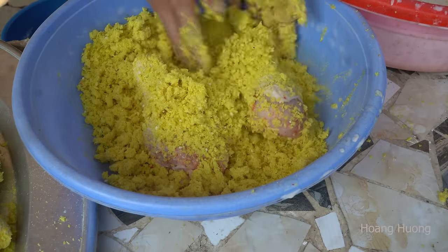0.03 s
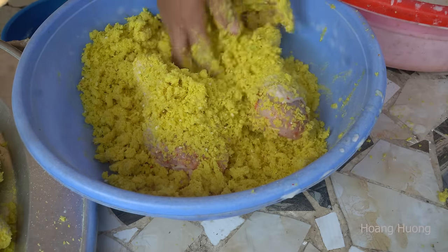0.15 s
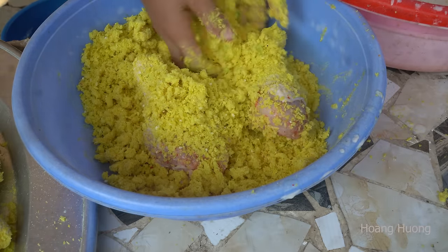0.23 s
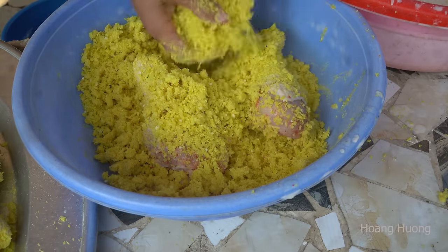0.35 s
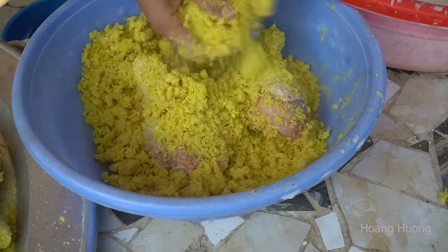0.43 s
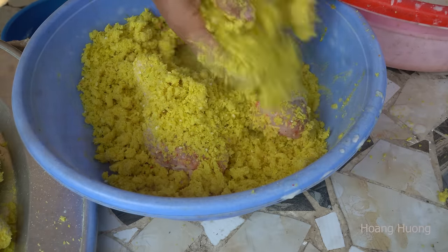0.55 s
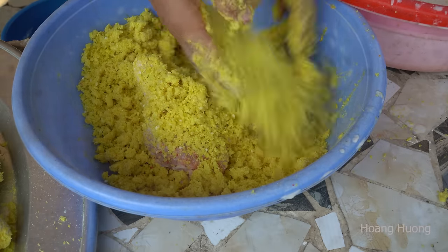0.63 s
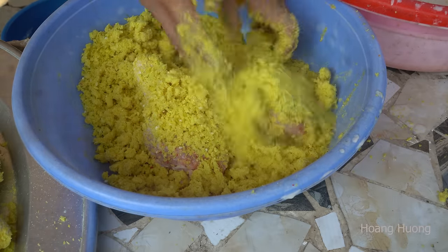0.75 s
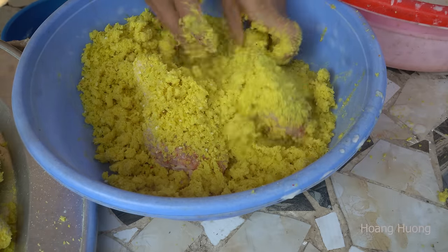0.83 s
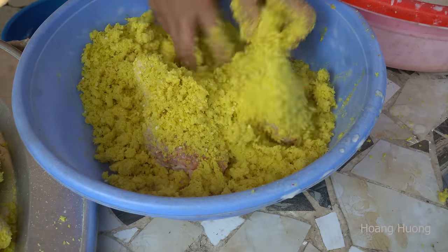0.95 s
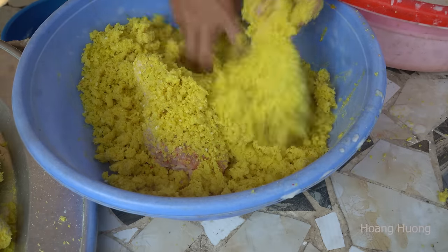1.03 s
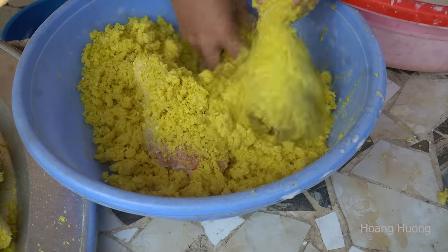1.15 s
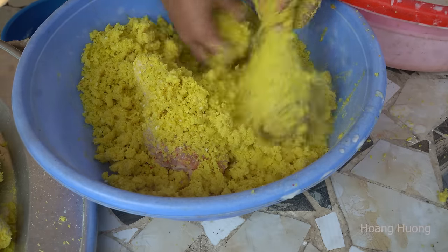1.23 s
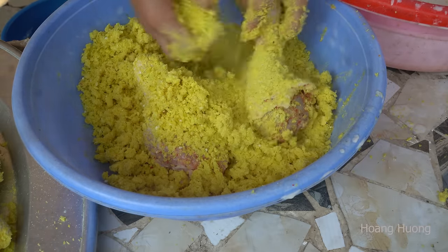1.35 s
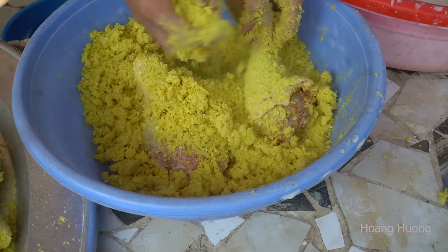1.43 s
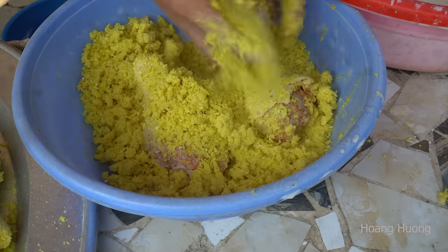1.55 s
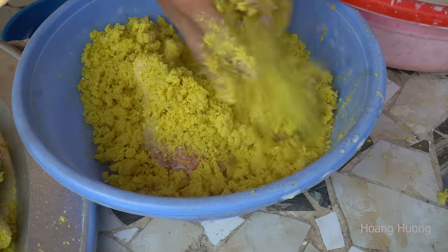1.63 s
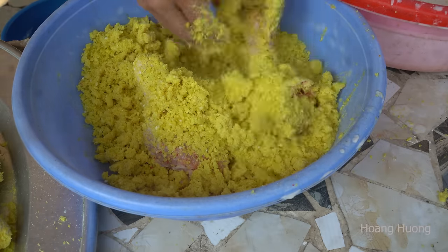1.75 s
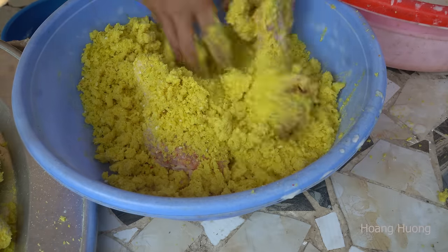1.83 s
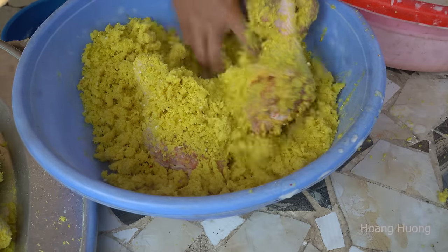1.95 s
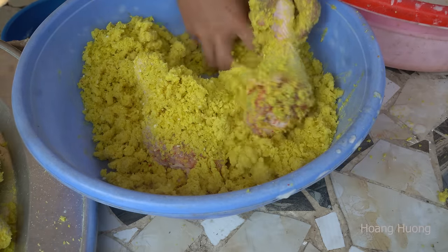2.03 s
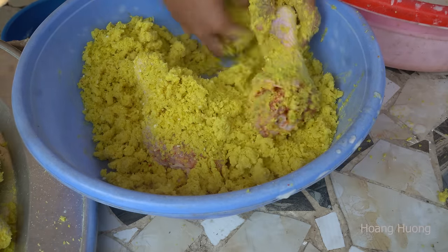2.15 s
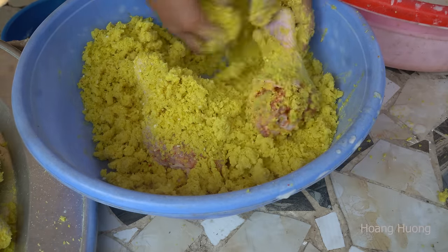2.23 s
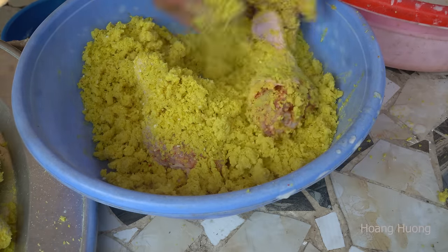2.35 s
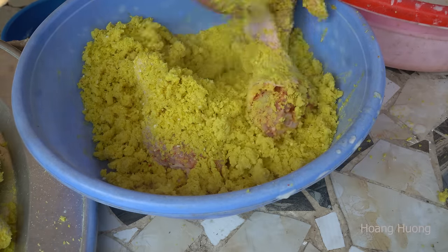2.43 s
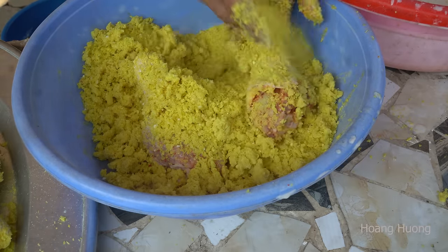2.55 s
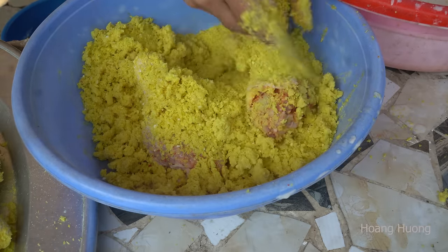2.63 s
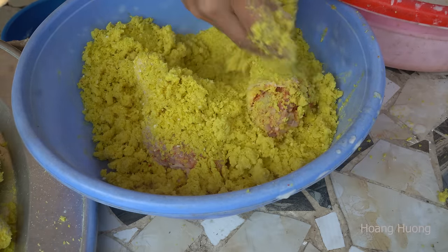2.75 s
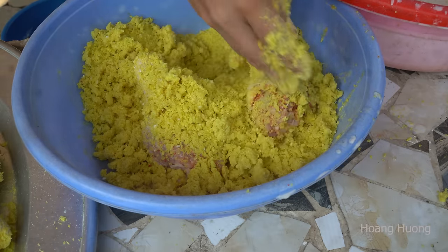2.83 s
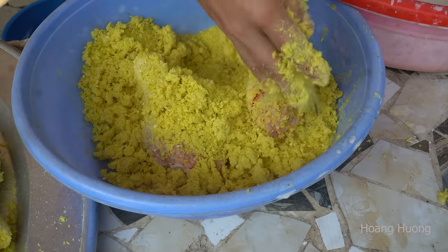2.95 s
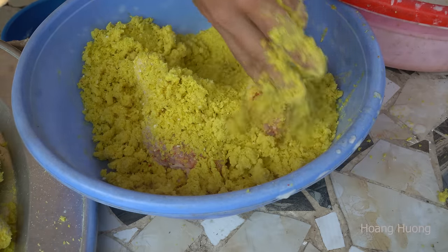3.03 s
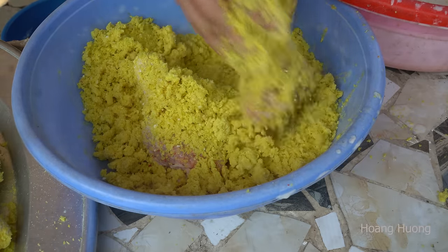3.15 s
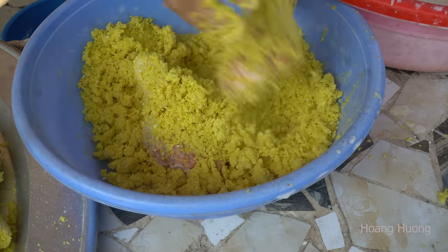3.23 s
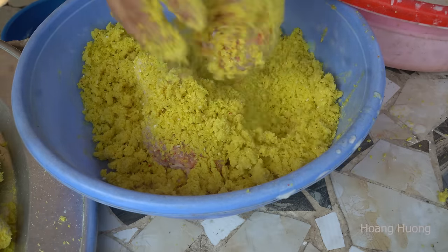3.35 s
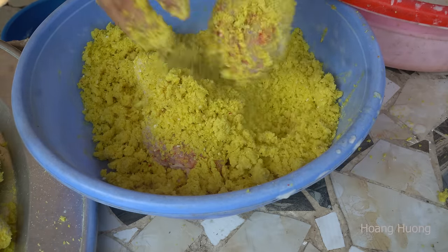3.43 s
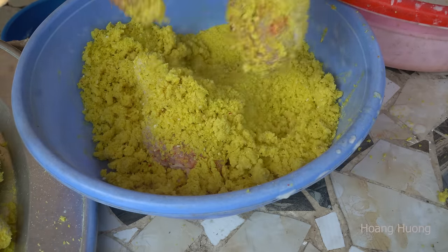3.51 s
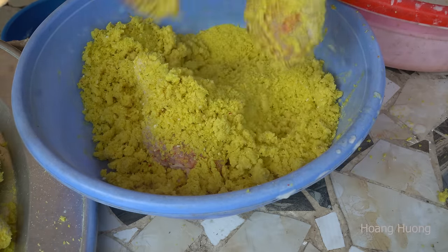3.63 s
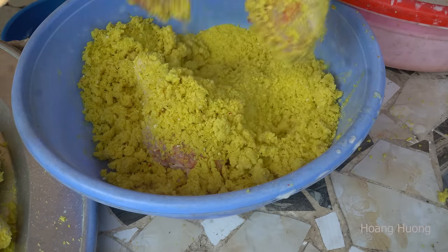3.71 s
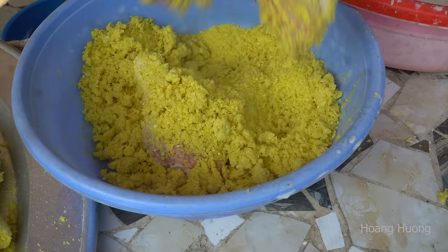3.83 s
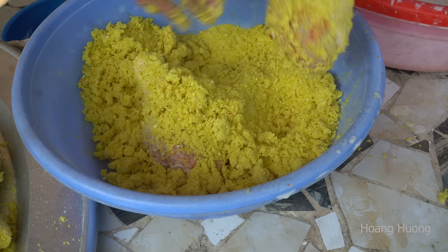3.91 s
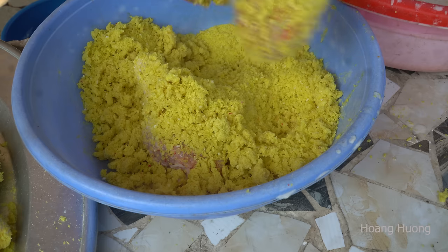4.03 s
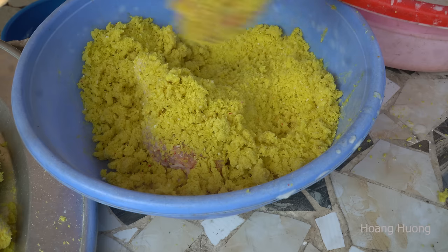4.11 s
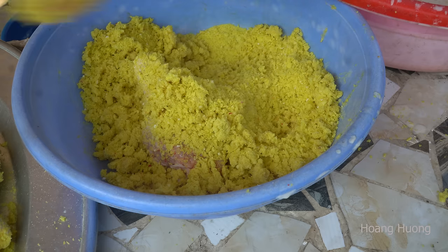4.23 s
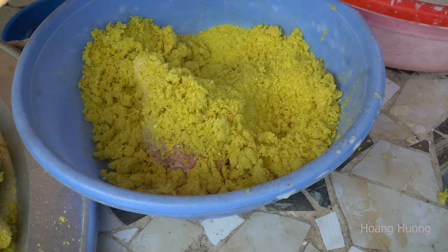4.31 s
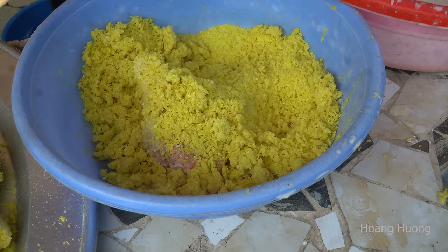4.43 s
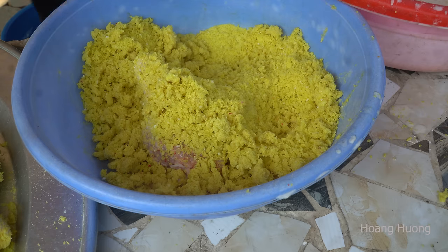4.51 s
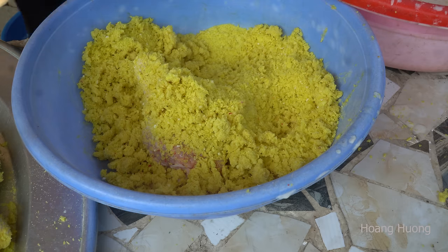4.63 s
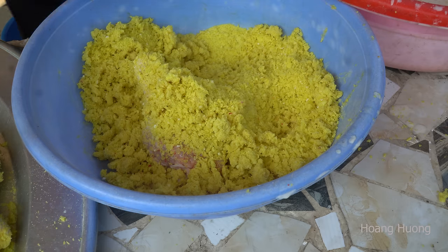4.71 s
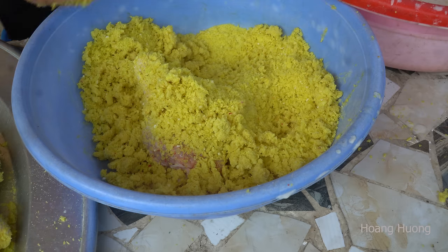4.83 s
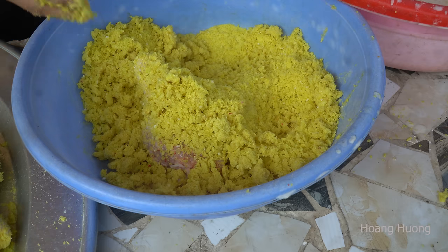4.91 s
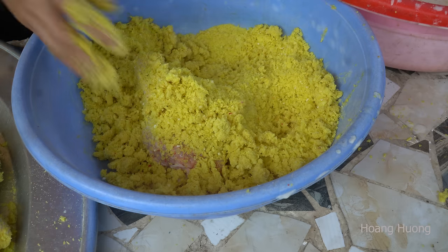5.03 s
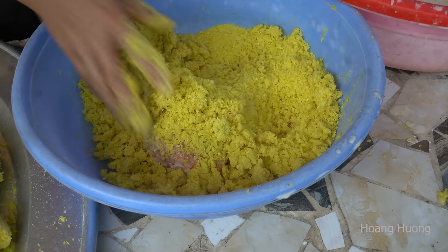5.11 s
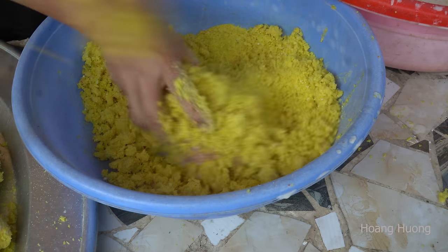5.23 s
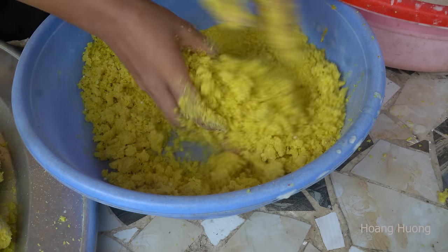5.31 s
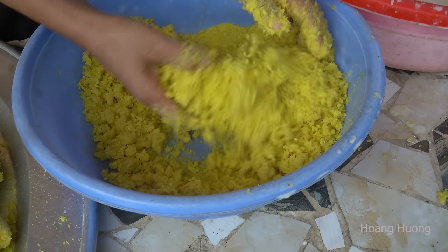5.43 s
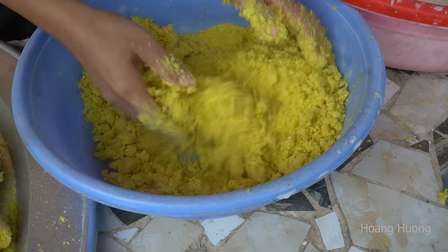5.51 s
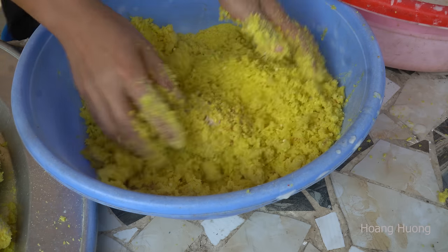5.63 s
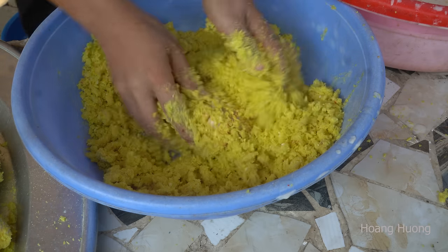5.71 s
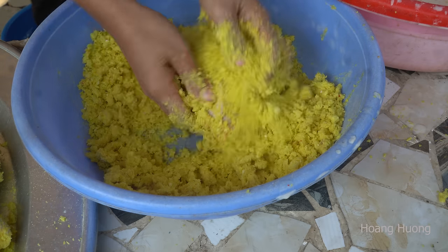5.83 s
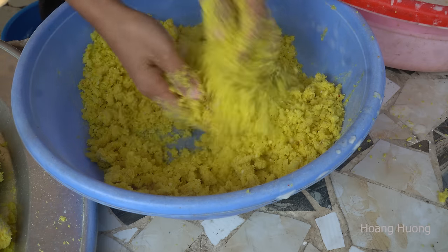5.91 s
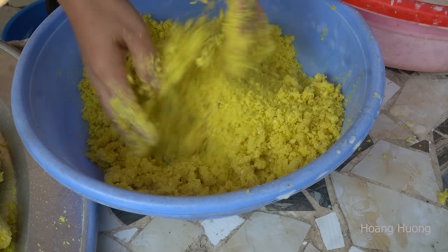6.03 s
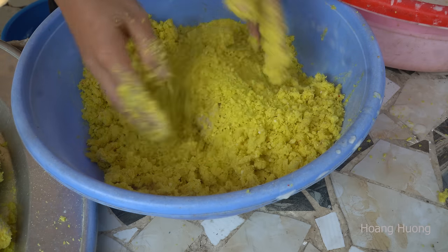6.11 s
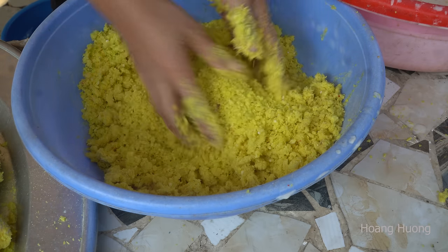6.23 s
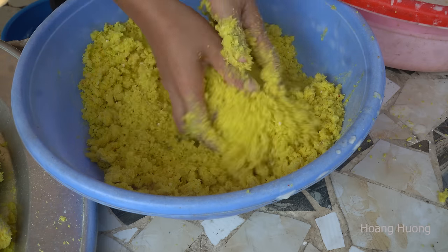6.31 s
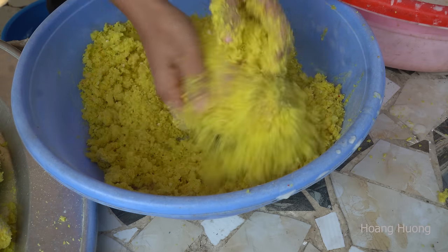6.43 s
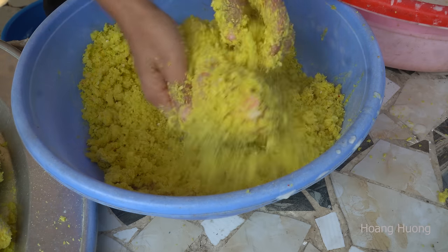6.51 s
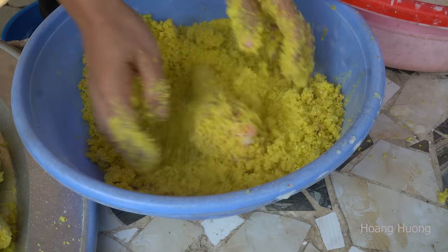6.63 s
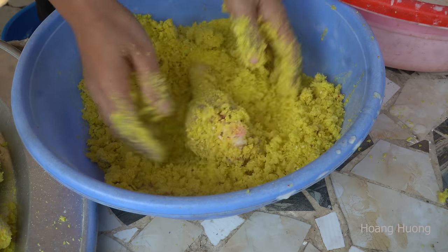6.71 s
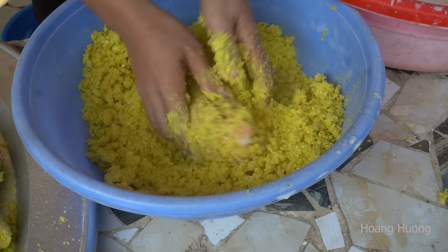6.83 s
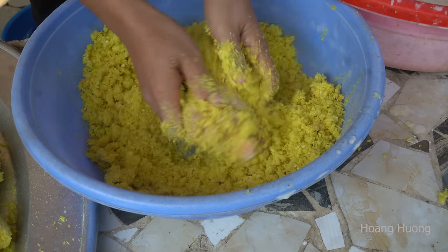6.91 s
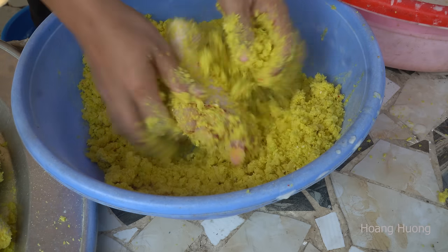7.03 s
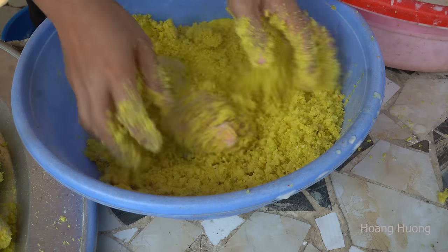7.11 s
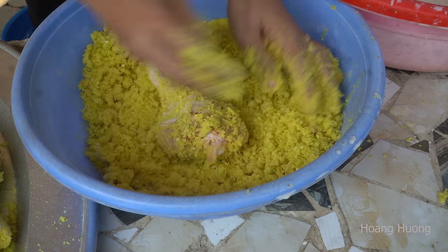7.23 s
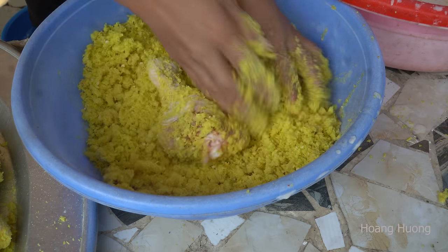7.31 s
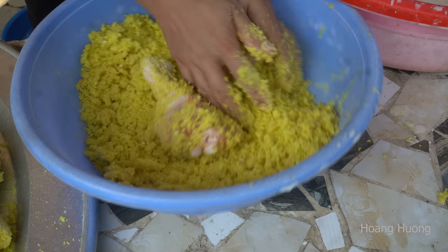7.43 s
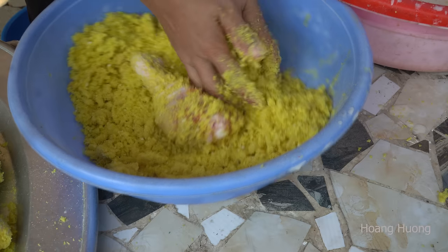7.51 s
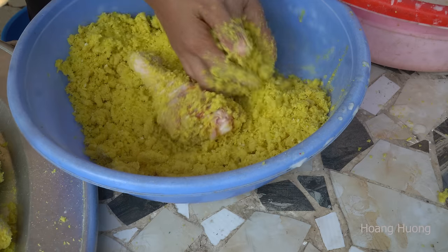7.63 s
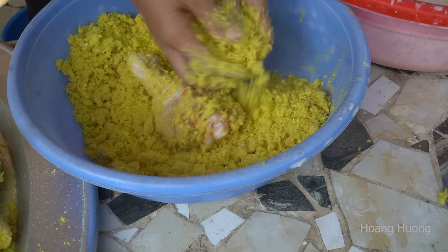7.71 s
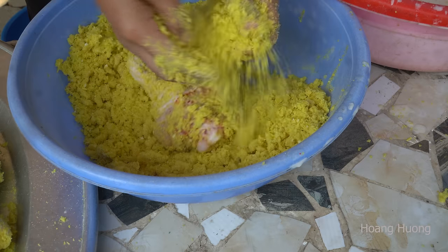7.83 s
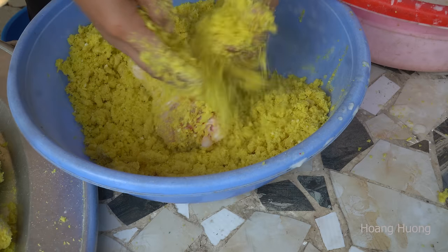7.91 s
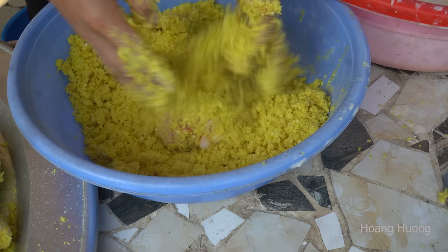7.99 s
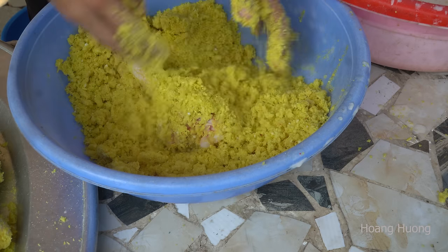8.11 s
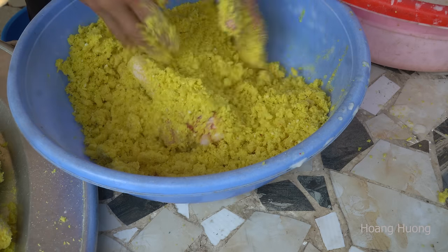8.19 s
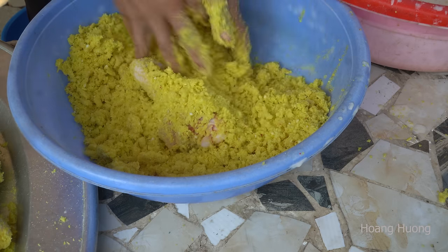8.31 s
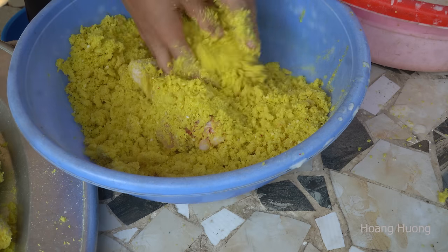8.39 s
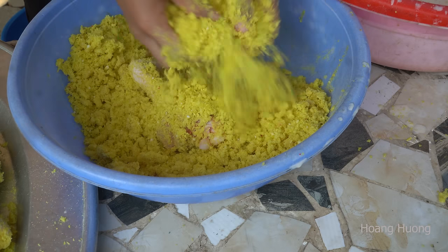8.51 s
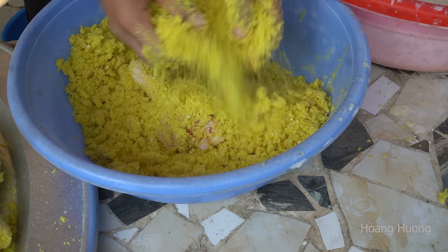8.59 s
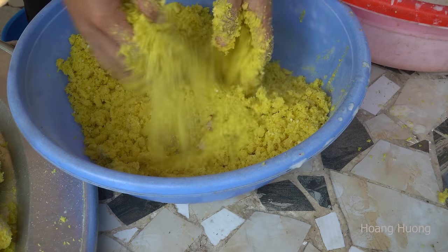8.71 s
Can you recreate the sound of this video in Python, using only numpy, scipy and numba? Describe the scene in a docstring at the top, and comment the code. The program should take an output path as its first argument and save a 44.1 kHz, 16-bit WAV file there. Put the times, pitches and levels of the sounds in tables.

```python
"""Crumbing chicken by hand

Two hands scoop dry breadcrumbs over raw chicken in a plastic basin on a tiled floor, close to the microphone.
Each stroke is a swarm of random clicks and noise: digging deep adds the basin's body, poured crumbs mostly fizz.
Short filtered bursts make the cracks, ticks and sticky smacks, noise-fed resonances rasp and paired sines thud.
Low noise in gusts rumbles on the microphone over a faint far drone and steady hiss."""
import sys
import numpy as np
from scipy import signal
from scipy.fft import rfft, irfft
from scipy.io import wavfile
from scipy.ndimage import map_coordinates
from numba import njit

SR = 44100
rng = np.random.default_rng(int(sys.argv[2]) if len(sys.argv) > 2 else 0)


def wav_out(sig):
    """Save sig, one row per channel (or a flat mono array), as 16-bit PCM at SR to the path in sys.argv[1]."""
    wavfile.write(sys.argv[1], SR, np.round(np.clip(np.atleast_2d(sig).T, -1, 1) * 32767).astype(np.int16))


N = 386316
TIME = np.arange(N) / SR
STEPS = np.arange(0, N, 64) / SR  # coarser clock for the level curves, in seconds
FILTER_SIZE = 8192
FREQ = np.maximum(np.arange(FILTER_SIZE // 2 + 1) * SR / FILTER_SIZE, 1)
SIDES = np.array([[1], [-1]])  # left, right
# resonances of the loaded basin: centre_hz, width_hz, lift_db
BASIN = [(858, 150, 6.5), (1161, 92, 5), (1672, 44, 4), (1880, 100, 2.5), (2590, 38, 5.5), (3915, 160, 2)]


def undb(db):
    """Decibels to gain."""
    return 10 ** (np.asarray(db) / 20)


def unit(x):
    """Scale to rms 1."""
    return x / np.sqrt(np.mean(x ** 2))


def curves(table):
    """Each column of a table, after its time column, as a value per sample."""
    s, *columns = np.transpose(table)
    return [np.interp(TIME, s, column) for column in columns]


def spectrum(points):
    """Gain at every frequency from (Hz, dB) points, joined along log frequency."""
    hz, db = np.transpose(points)
    return undb(np.interp(np.log(FREQ), np.log(hz), db))


def bell(hz, width_hz):
    """Gain of one resonance, 1 at its centre."""
    return 1 / np.sqrt(1 + ((FREQ ** 2 - hz ** 2) / (FREQ * width_hz)) ** 2)


def lifted(resonances):
    """Gain of (Hz, width Hz, dB lift) resonances on a flat spectrum; overlapping lifts add in dB."""
    return undb(sum(db * bell(hz, width) ** 2 for hz, width, db in resonances))


def impulse_response(gain):
    """Causal (minimum-phase) response with the given gain: it rings after a click, never before."""
    cepstrum = irfft(np.log(gain + 1e-6))[:FILTER_SIZE // 2]
    cepstrum[0] /= 2
    return irfft(np.exp(rfft(2 * cepstrum, FILTER_SIZE)))[None, :FILTER_SIZE // 2]


def colour(x, gain):
    """Filter each row of a sound with the given gain."""
    x = np.atleast_2d(x)
    return signal.oaconvolve(x, impulse_response(gain), axes=1)[:, :x.shape[1]]


@njit
def moving_ring(x, hz, width_hz):
    """State-variable band-pass whose centre may move; gain 1 at the centre."""
    y, band, low = np.empty(len(x)), 0., 0.
    for i in range(len(x)):
        g, k = np.tan(np.pi * hz[i] / SR), width_hz / hz[i]
        v = (band + g * (x[i] - low)) / (1 + g * (g + k))
        band, low, y[i] = 2 * v - band, low + 2 * g * v, k * v
    return y


def walk(rate):
    """Random wander with a spread near 1, in straight lines between `rate` random knots per second."""
    knots = rng.standard_normal(4096)
    return map_coordinates(knots, [TIME * rate], order=1, mode="wrap") * np.sqrt(3 / 2)


def swell(start, rise, hold, fall):
    """Attack, hold and release in dB: 0 at the top, straight slopes in dB on either side."""
    range_db = 20.5  # spanned by each rise or fall; the slopes then run on to ten times this
    early = (start + rise - STEPS) / max(rise, 1e-3)
    late = (STEPS - start - rise - hold) / max(fall, 1e-3)
    return -range_db * np.clip(np.maximum(early, late), 0, 10)


def together(levels_db, floor_db):
    """Level per sample of overlapping sounds above a floor: their powers add."""
    power = np.sum(undb(levels_db) ** 2, axis=0) + undb(floor_db) ** 2
    return np.interp(TIME, STEPS, 10 * np.log10(power))


def add(out, s, sound, db, pan_db):
    """Place a short sound at its start time, peak level of the middle and side."""
    start = int(s * SR)
    sound = np.atleast_2d(sound)
    sound = (sound / np.abs(sound.mean(axis=0)).max())[:, :N - start]
    out[:, start:start + sound.shape[1]] += sound * undb(db + SIDES * pan_db / 2)


def fracture(snap_s, settle_s, settle_db):
    """One sharp break and the short rattle of its fragments, as fading random signs: (mid, side)."""
    t = TIME[:2048]
    decay = np.exp(-t / snap_s) + undb(settle_db) * np.exp(-t / settle_s)
    return np.sign(rng.standard_normal((2, len(t)))) * decay


def grains(rate, scatter_db):
    """Random clicks of steady mean power, each from its own direction: (mid, side)."""
    chance, sign, place = rng.random(N), rng.standard_normal(N), rng.standard_normal(N)
    size = undb(scatter_db * np.minimum(rng.exponential(size=N), 4))
    # denser clicks are made smaller so that the power holds
    clicks = unit((chance < rate / SR) * np.sign(sign) * size / np.sqrt(rate))
    return np.array([clicks, clicks * np.sign(place) * np.sqrt(np.abs(place))])


def off_the_wall(x):
    """The basin's wall returns a weaker copy about 2 ms later."""
    lag, strength = int(SR * rng.uniform(.0015, .0023)), .55
    return x + strength * np.pad(x, ((0, 0), (lag, 0)))[:, :x.shape[1]]


def air(gain, width):
    """Stereo noise of a given colour; mid and side share one rms of 1 before the side is widened."""
    mid, side = unit(colour(rng.standard_normal((2, N)), gain))
    return mid + width * SIDES * side


def rumble(trim_db=0.1, flutter_db=3.4):
    """Puffs of air on the microphone: very low noise that swells and flutters."""
    # puffs: start_s, rise_s, hold_s, fall_s, level_db (before trim and flutter)
    puffs = [(0.0, 0.64, 0.26, 0.28, -54.5), (0.976, 0.074, 0.21, 0.38, -52.5),
             (1.415, 0.19, 0.11, 0.28, -54), (1.8, 0.14, 0.043, 1.2, -65.5),
             (2.85, 0.11, 0.27, 0.19, -65.5), (4.242, 0.27, 0.81, 0.25, -53),
             (5.446, 0.091, 0.15, 2.1, -53.5), (6.297, 0.12, 0.4, 0.31, -53), (7.5, 0.13, 0.25, .15, -71),
             (8.035, 0.068, 0.035, 0.58, -63)]
    # colour of the moving air: freq_hz, gain_db (relative)
    draught_colour = [(11, -35), (18, 6.5), (32, 5), (51, -2), (84, -7.5), (167, -25), (243, -40.5),
                      (300, -43), (390, -43), (660, -120)]
    calm_db = -79  # between the puffs, before trim and flutter
    wind_db = together([db + swell(*shape) for *shape, db in puffs], calm_db)
    tone = spectrum(draught_colour) / (1 + (22 / FREQ) ** 4)  # thins out below 22 Hz
    return air(tone, width=0.15) * undb(wind_db + trim_db + flutter_db * walk(rate=11))


def drone(drone_hz=415, width_hz=120, waver_db=3.6):
    """A far, wavering drone: a narrow band of noise that swells now and then."""
    # swells: top_s, level_db (before the waver)
    drone_swells = [(.4, -67), (2.78, -64), (3.76, -71.5), (4.93, -66.5), (5.999, -60.5), (8.0, -66.5)]
    rest_db, rise_s, fall_s = -77.5, 0.31, 0.16
    levels_db = [db + swell(s - rise_s, rise_s, 0, fall_s) for s, db in drone_swells]
    far_db = together(levels_db, rest_db)
    return air(bell(drone_hz, width_hz) ** 2, width=0.12) * undb(far_db + waver_db * walk(rate=11))


def hiss(level_db=-75.5):
    """Steady faint background noise, as wide as it is central."""
    # colour: freq_hz, gain_db (relative)
    ambience = [(35, -21), (60, -18), (210, -6.5), (298, -6), (385, -4), (773, -12), (1320, -12),
                (1900, -13), (3200, -14.5), (4800, -19), (6500, -21.5), (15500, -32)]
    # narrow peaks: centre_hz, width_hz, lift_db
    hiss_peaks = [(4100, 380, 9.5), (5540, 280, 13.5)]
    return air(spectrum(ambience) * lifted(hiss_peaks), width=1.0) * undb(level_db)


def background():
    """Gusty rumble on the microphone, a far drone and steady faint hiss."""
    return rumble() + drone() + hiss()


def room(x, t60_s, wet_db, damp_hz):
    """Tiles and walls return a short, duller tail: decaying noise through a gentle low-pass."""
    t = TIME[:SR // 2]
    tail = rng.standard_normal((2, len(t))) * undb(-60 * t / t60_s) * (t > .003)  # 3 ms gap first
    tail = signal.sosfilt(signal.butter(1, min(damp_hz, SR / 3), fs=SR, output="sos"), tail)
    tail = tail / np.sqrt(np.sum(tail ** 2) / 2)
    return x + undb(wet_db) * signal.oaconvolve(x, tail, axes=1)[:, :N]


def bumps(rise_s=0.0041, decay_s=0.017, overtone=1.654, overtone_db=-8):
    """The crumb-laden basin thuds in two sine modes and dies away within a few cycles."""
    # dull bumps: start_s, peak_db, pitch_hz
    thuds = [(0.853, -73, 120), (1.254, -71, 119), (1.974, -48, 130), (4.97, -41, 131), (6.69, -50.5, 172),
             (6.968, -63, 129), (7.519, -47, 208), (7.565, -49, 167), (7.591, -52.5, 122), (8.41, -62, 130)]
    out, t = np.zeros((2, N)), TIME[:8192]
    for s, db, hz in thuds:
        modes = np.sin(2 * np.pi * hz * t) + undb(overtone_db) * np.sin(2 * np.pi * hz * overtone * t)
        add(out, s, modes * (1 - np.exp(-t / rise_s)) * np.exp(-t / decay_s), db, 0)
    return out


def rings(rise_s=0.00059, width_hz=260):
    """Rubbing crumbs feed a narrow resonance for a moment: a rough tone that swells and fades."""
    # rasps on the plastic: start_s, peak_db, pitch_hz, decay_s
    rasps = [(0.703, -45, 2110, 0.035), (1.713, -42, 2070, 0.014), (2.63, -66, 2120, 0.065),
             (3.775, -59.5, 2210, 0.036), (3.869, -62.5, 2530, .06), (7.485, -31, 564, 0.022),
             (8.722, -55, 2520, 0.035)]
    out, t = np.zeros((2, N)), TIME[:8192]
    for s, db, hz, decay_s in rasps:
        rub = rng.standard_normal(len(t)) * (1 - np.exp(-t / rise_s)) * np.exp(-t / decay_s)
        add(out, s, colour(rub, bell(hz, width_hz) ** 2), db, pan_db=-5)
    return out


def smacks(ring_width_hz=550, ring_db=8, snap_s=.0007, tail_s=0.026, tail_db=-24, spread=0.25):
    """A damp film snaps and the small air pocket behind it rings for a few cycles."""
    # sticky skin and damp clumps parting: start_s (0.54 ms early), peak_db, ring_hz,
    # snap_db (gain of the broad snap), pan_db (left minus right)
    partings = [(0.72, -33.5, 2160, -1, -4.0), (0.737, -29.5, 3360, -14, -11), (1.7053, -39, 2120, 29, -8),
                (1.7116, -39, 1900, -17, -8), (1.7892, -31.5, 1840, 14, -8), (1.8079, -35.5, 2080, 6, -6),
                (2.4232, -40, 2070, 1, 4), (2.624, -38, 2220, 10, -4), (2.656, -42.5, 2100, 13, -7),
                (3.0068, -46.5, 1990, -21, -6), (3.018, -43.5, 1920, -13, -5),
                (3.6589, -38, 2370, -4.5, -9.5), (3.6833, -44, 1680, 3, -5.5), (4.1137, -47, 2180, -10, -3),
                (4.152, -53, 2160, -10, -11)]
    out = np.zeros((2, N))
    edge = spectrum([(400, -7), (1200, -48), (2000, 5.5), (3600, -5.0), (5000, -4.5), (9000, -4),
                     (15000, -13.5)])
    for s, db, hz, snap_db, pan_db in partings:
        pocket = undb(ring_db) * bell(hz, ring_width_hz) * bell(hz, 2 * hz)
        tone = pocket + undb(snap_db) * edge
        mid, side = colour(off_the_wall(fracture(snap_s, tail_s, tail_db)), tone)
        add(out, s + 0.00054, mid + spread * SIDES * side, db, pan_db)
    return out


def shed():
    """Tick rows for crumbs that drop at random off the lifted drumstick, smaller on the whole as they go."""
    # when they fall: first_s, last_s
    first, last = (3.08, 4.08)
    count, level_db, fade_db_per_s, scatter_db = 22, -52, 2, 2.5
    bright_db, pan_db = -3, -7
    after = (np.arange(count) + rng.random(count)) / count * (last - first)
    size, bright = scatter_db * rng.standard_normal((count, 2)).T
    return [(first + s, level_db - fade_db_per_s * s + a, bright_db + 2 * b, pan_db)
            for s, a, b in zip(after, size, bright)]


def ticks(snap_s=.0005, settle_s=0.0046, settle_db=-20, spread=0.49, trim_db=-1):
    """A dry crumb snaps or drops on the heap: too small to ring, it makes a broad, bright click."""
    # single crumbs: start_s (0.85 ms early), peak_db (before the trim),
    # bright_db (gain of the bright part, body 0), pan_db (left minus right)
    single_crumbs = [(0.418, -35, -24, -4), (0.4893, -42, -19, -3), (2.6864, -42.5, -11, -9),
                     (3.1313, -46, -9, -6), (3.1531, -48, 4, -3), (3.7307, -43.5, -5, -8),
                     (7.158, -37.5, -15, -4), (8.159, -26.5, -22, -4), (8.585, -37, 0, -6),
                     (8.676, -34.5, -7, 0), (8.71, -37, -25, -3), (8.74, -39, -21, -4.0)]
    out = np.zeros((2, N))
    body = bell(hz=3100, width_hz=2900) ** 2
    bright = spectrum([(500, -18), (2000, -33), (5000, -11.5), (9000, -4.5), (15000, -6.0)])
    for s, db, bright_db, pan_db in single_crumbs + shed():
        click = off_the_wall(fracture(snap_s, settle_s, settle_db))
        mid, side = colour(click, body + undb(bright_db) * bright)
        add(out, s + 0.00085, mid + spread * SIDES * side, db + trim_db, pan_db)
    return out


def cracks(snap_s=.0011, settle_s=0.0012, settle_db=-18, spread=0.19):
    """A hard crumb gives way at once; its fragments settle and the basin rings briefly."""
    # coarse crumbs against the plastic: start_s, peak_db, pan_db (left minus right)
    hard_crumbs = [(1.9432, -26.5, -2), (1.9502, -26, 2), (1.9736, -23.5, 1), (2.034, -29, 1),
                   (2.0675, -25.5, -1), (4.787, -44.5, 14), (4.972, -42, 16), (5.127, -40.5, 15.5),
                   (5.5674, -24, 0.5), (6.129, -32, 1), (6.533, -31, -1), (6.614, -34, -3),
                   (6.692, -30.5, 2), (6.8221, -39, 7), (7.1949, -32, -2), (7.485, -26, 6)]
    out = np.zeros((2, N))
    tone = spectrum([(200, -18), (550, -4), (1300, -3), (2400, 0), (4500, -5), (8000, -13), (15000, -21)])
    tone = tone * lifted(BASIN)
    for s, db, pan_db in hard_crumbs:
        mid, side = colour(fracture(snap_s, settle_s, settle_db), tone)
        add(out, s, mid + spread * SIDES * side, db, pan_db)
    return out


def grit(push_db, pan_db, rate=60, follow=0.64, level_db=-57, spread=0.89):
    """Larger damp crumbs patter and ring faintly; they follow the hands only in part, so light moves bare them."""
    tone = spectrum([(300, -31), (1000, -18), (2200, 0), (4000, 5.0), (6000, -26.0), (10000, -12.0),
                     (15000, -30)])
    tone = tone * lifted([(2170, 140, 18), (2780, 120, 5.7), (3820, 350, 4)])
    mid, side = colour(off_the_wall(grains(rate, scatter_db=2.0)), tone)
    patter = (mid + spread * SIDES * side) / mid.std()
    return patter * undb(level_db + follow * (push_db - push_db.max()) + SIDES * pan_db / 2)


def hands():
    """Scoops, pours and pats add up to levels of crunch, body and fizz; the louder ones weigh most on the side."""
    # a hand shoves through the crumbs: start_s, rise_s, hold_s, fall_s, crunch_db,
    # body_db (re crunch), fizz_db (re crunch), pan_db (left minus right; each layer takes its share)
    scoops = [(0.0, 0.012, 0.16, 0.2, -46, -10, -7.5, -7.5),
              (0.06, 0.07, 0.11, 0.097, -41.5, -5.5, -17, -1),
              (0.32, 0.048, 0.062, 0.065, -53.5, -15, -9, -3),
              (0.965, 0.042, 0.021, 0.25, -42, -6, -13, -2),
              (1.02, 0.069, 0.031, 0.17, -40.5, -5.5, -9.5, -8),
              (1.23, 0.068, 0.069, 0.1, -55.5, -9, -10.5, -7),
              (1.898, 0.046, 0.099, 0.082, -43, -5, -10, -3), (2.0, 0.11, 0.048, 0.14, -43.5, -7, -5, -8),
              (2.24, 0.041, 0.14, 0.15, -56.5, -9.5, -9, -8),
              (5.22, 0.087, 0.054, 0.15, -40, -7.5, -10, -2.5),
              (5.47, 0.075, .15, 0.087, -45, -4.5, -10, -5),
              (5.68, 0.045, .125, 0.11, -40, -5.5, -12.5, -1.5),
              (5.93, 0.053, 0.12, 0.049, -51.5, -4.5, -7.5, 0),
              (6.2, 0.096, 0.043, 0.12, -43, -4.5, -9, -0.5),
              (6.808, 0.018, 0.066, 0.09, -42.5, -5, -12.5, 0),
              (7.28, .16, 0.044, 0.066, -40, -12, -7.5, -13),
              (7.465, 0.023, 0.089, 0.11, -40, -5, -9.5, -5),
              (8.19, 0.035, 0.072, 0.069, -46.5, -15.5, -7, -9),
              (8.24, 0.13, 0.036, 0.13, -39.5, -5.5, -8.5, -4)]
    # loose crumbs run off the fingers onto the heap: same columns as the scoops
    pours = [(0.437, 0.036, 0.043, 0.43, -66.5, -18, -2.5, -6),
             (0.654, 0.069, 0.023, 0.11, -50, -11, 1, -15), (0.76, 0.034, 0.035, 0.22, -56, -9.5, -5, -8),
             (1.417, 0.1, 0.035, 0.17, -73, 0.5, 1.5, -10.5),
             (1.622, 0.094, 0.12, 0.095, -64, -5.5, 3, -10), (2.444, 0.029, 0.24, 0.52, -73, -5, 2.5, -8),
             (3.019, 0.054, 0.062, 0.74, -73.5, -16, 2.5, -17), (3.49, 0.12, 0.52, 0.2, -74, -15, -1.5, -8),
             (4.783, .02, 0.13, 0.15, -75, -2.5, 2.5, 15), (4.95, 0.073, 0.12, 0.069, -68, -5.5, 2.5, 21),
             (5.82, 0.054, 0.022, 0.053, -52, -1.5, 3, -1), (6.411, 0.15, 0.073, 0.37, -53.5, -7.5, -3, -7),
             (6.926, 0.061, 0.23, 0.45, -72, -1, 6, -0.5), (7.137, 0.036, 0.027, 0.22, -51, -10, -8.5, -8),
             (7.672, 0.058, 0.23, 0.3, -65, -10.5, 4, -8), (8.063, 0.029, 0.042, 0.19, -60, -21, 1.5, -13),
             (8.463, 0.034, 0.25, .3, -66, -7.5, 5, -3)]
    # a clump or a piece of chicken lands on the heap: start_s, then crunch_db to pan_db as in the scoops
    pats = [(4.783, -58, -2.5, 0.5, 16), (4.97, -61, 2.5, -15, 18), (5.21, -60, -0.5, -18, 13),
            (6.126, -50.5, 0, -2, -1), (6.616, -45, -0.5, -6, 3), (6.684, -49, 0.5, -22, 1)]
    # the heap settles between strokes: crunch_db, body_db, fizz_db
    rest_db = (-89, -91, -87)
    pat_rise_s, pat_hold_s, pat_fall_s = 0.0033, 0.002, 0.046
    body_growth, fizz_growth = 0.93, 0.85  # dB per dB of crunch within a stroke
    strokes = scoops + pours + [(s, pat_rise_s, pat_hold_s, pat_fall_s, *rest) for s, *rest in pats]
    shape = np.array([swell(*row[:4]) for row in strokes])
    db, body_db, fizz_db, pan_db = np.array([row[4:] for row in strokes]).T[:, :, None]
    weight = undb(db + shape)
    side_db = np.sum(weight * pan_db, axis=0) / weight.sum(axis=0)
    return (together(db + shape, rest_db[0]),
            together(db + body_db + body_growth * shape, rest_db[1]),
            together(db + fizz_db + fizz_growth * shape, rest_db[2]),
            np.interp(TIME, STEPS, side_db))


def crumbs(push_db, deep_db, fine_db, pan_db, rate=7000, crowding=.35, rub=1.0, jerk_db=1.3, clump_db=1.0,
           ring_width_hz=90, body_hz=1350, fizz_hz=5400):
    """Crumbs break and slide: a harder push breaks more of them each second, in small jerks."""
    # colour of crumbs shoved across the basin: freq_hz, gain_db (relative)
    crumb_colour = [(100, -15.5), (200, -16), (300, -17.5), (440, -10.5), (580, -2.5), (850, -5),
                    (1020, -6.5), (1900, 0), (3000, 0.5), (4000, -1.5), (5200, -3.5), (7000, -5.5),
                    (10000, -5), (13000, -9.5), (16000, -8)]
    # the basin's lowest ring moves as the hands shift the load on it: time_s, pitch_hz, strength_db
    hollow = [(0, 600, 7), (1.1, 585, 2), (2.1, 558, 4), (5.3, 633, -2), (5.8, 720, -5), (6.3, 647, -10),
              (6.9, 716, 1.5), (7.3, 570, 7.5), (7.55, 543, 6), (8.4, 600, -9), (8.76, 600, -7)]
    hollow_hz, hollow_db = curves(hollow)
    per_s = rate * undb(crowding * (push_db - push_db.max()))  # `rate` at the hardest push
    swarm = grains(per_s, scatter_db=3.0) + rub * rng.standard_normal((2, N))
    swarm = swarm * undb(jerk_db * walk(rate=130) + clump_db * walk(rate=34))
    tone = spectrum(crumb_colour) * lifted(BASIN)
    # the basin radiates as one body; single crumbs are scattered across the width
    width = spectrum([(600, -17.5), (1300, -10.5), (2600, -7.0), (5000, -3.5), (12000, -3.5)])
    mid, side = colour(swarm[0], tone)[0], colour(swarm[1], tone * width)[0]
    mid = mid + undb(hollow_db) * moving_ring(mid, hollow_hz, float(ring_width_hz))

    # the gap under the fingers keeps changing shape, so a resonance roams through the crunch
    gap_hz, gap_width_hz, gap_gain, gap_wander = 2160, 280, 0.86, 0.27
    # it sounds lower as the hand digs deeper (depth: body re crunch)
    sag_octaves_per_db, usual_depth_db = 0.24, -7
    sag_octaves = sag_octaves_per_db * (deep_db - push_db - usual_depth_db)
    roaming_hz = gap_hz * np.exp(gap_wander * walk(rate=14)) / 2 ** sag_octaves
    mid = mid + gap_gain * moving_ring(mid, np.minimum(roaming_hz, SR / 4), float(gap_width_hz))

    # deep strokes bring out the basin's body, light ones the fizz of the finest crumbs
    whole = rfft(mid + SIDES * side)
    hz = np.arange(N // 2 + 1) * SR / N
    body = 1 / (1 + (hz / body_hz) ** 5)
    fizz = 1 - 1 / (1 + (hz / fizz_hz) ** 4)
    crunch = 1 - body - fizz
    out = 0
    for share, db, lean_db in ((body, deep_db, 0), (crunch, push_db, 0.43 * pan_db),
                               (fizz, fine_db, 0.11 * pan_db)):
        part = irfft(whole * share, N)
        out = out + part / part.mean(axis=0).std() * undb(db + SIDES * lean_db / 2)
    return out


def scene():
    """All that happens in the basin, in its room, with the bumps and the background left dry."""
    push_db, deep_db, fine_db, pan_db = hands()
    basin = crumbs(push_db, deep_db, fine_db, pan_db) + grit(push_db, pan_db)
    basin = basin + cracks() + ticks() + smacks() + rings()
    return room(basin, t60_s=0.51, wet_db=-21.5, damp_hz=5400) + bumps() + background()


def record(dry):
    """The recorder cuts the top: a steep low-pass."""
    top_hz = 15900
    return signal.sosfilt(signal.ellip(10, .2, 70, top_hz, fs=SR, output="sos"), dry)


dry = scene()
out = record(dry)
wav_out(out)
```